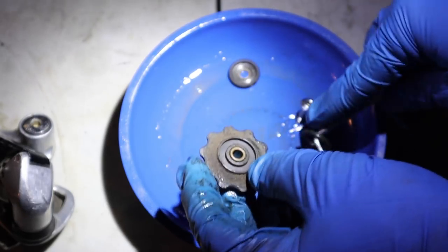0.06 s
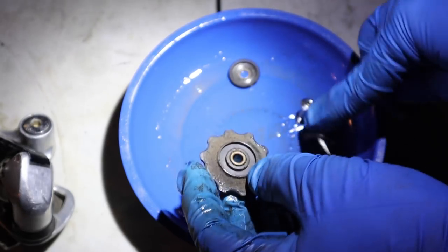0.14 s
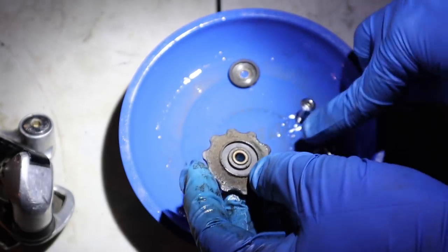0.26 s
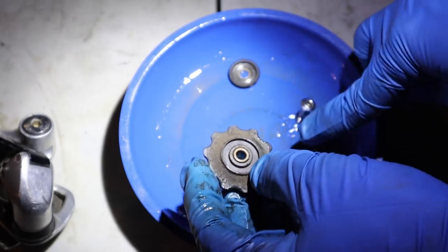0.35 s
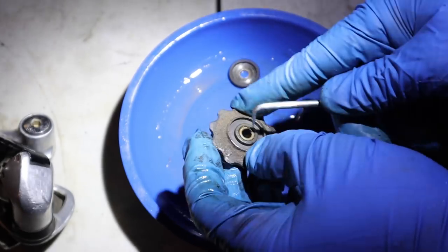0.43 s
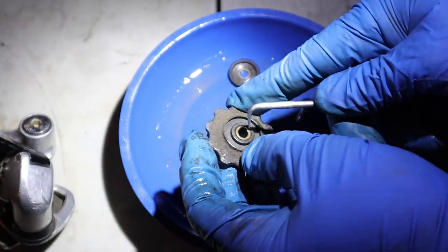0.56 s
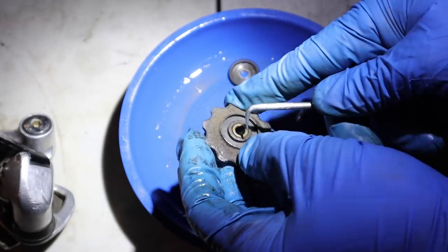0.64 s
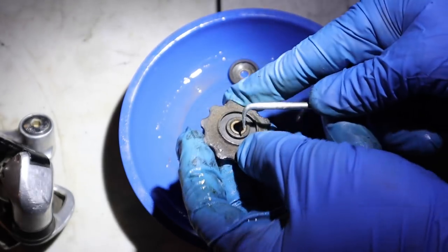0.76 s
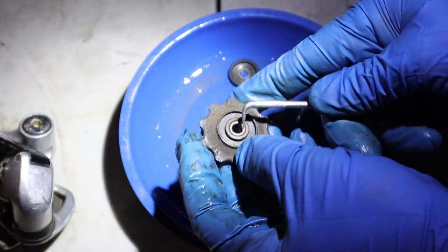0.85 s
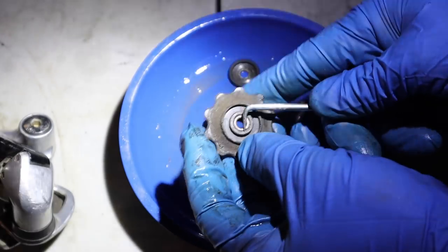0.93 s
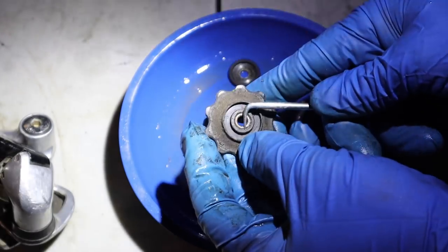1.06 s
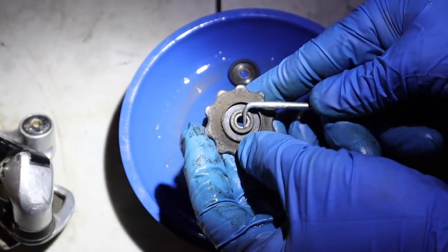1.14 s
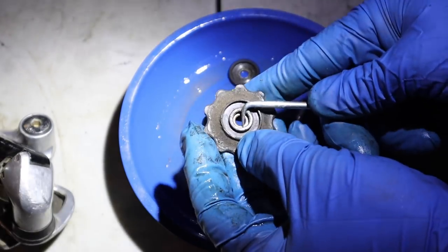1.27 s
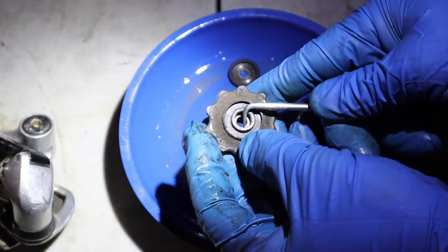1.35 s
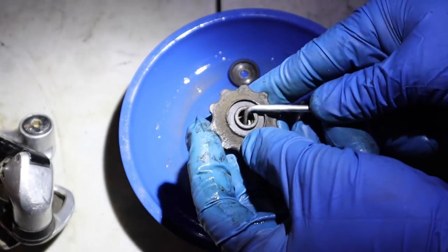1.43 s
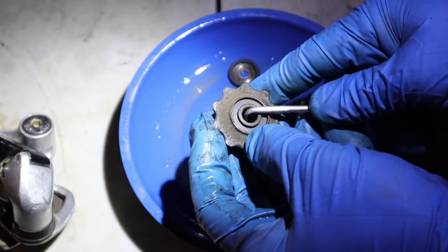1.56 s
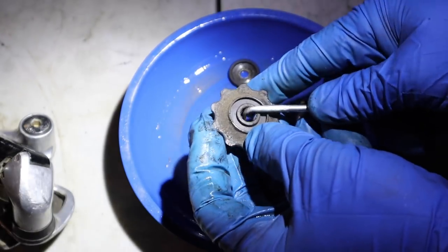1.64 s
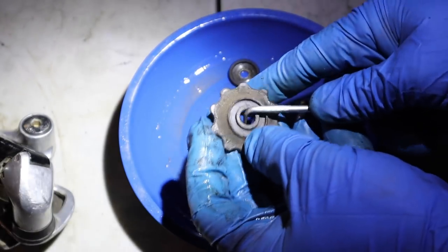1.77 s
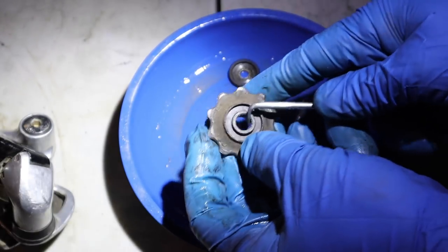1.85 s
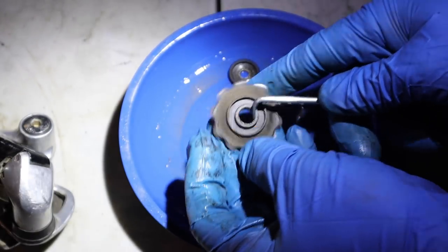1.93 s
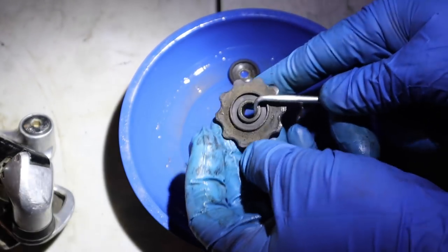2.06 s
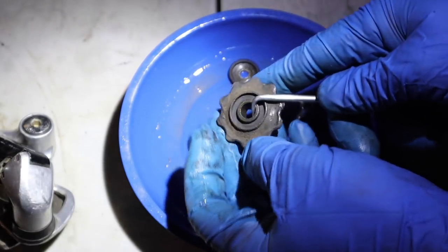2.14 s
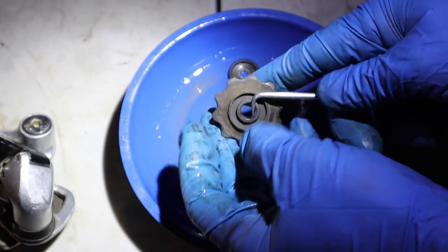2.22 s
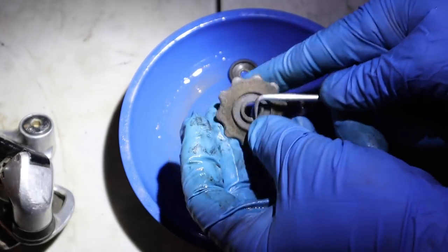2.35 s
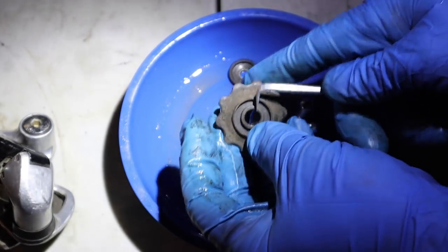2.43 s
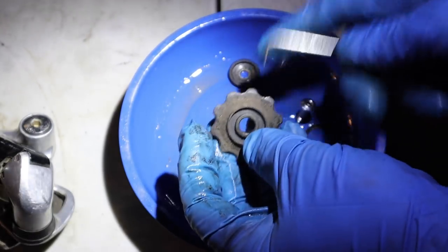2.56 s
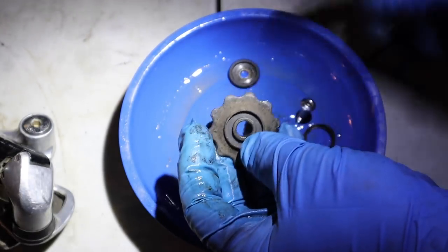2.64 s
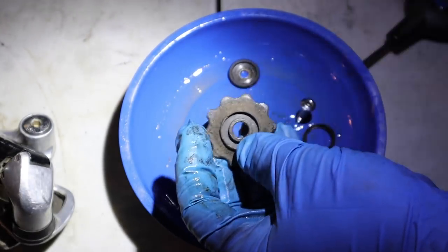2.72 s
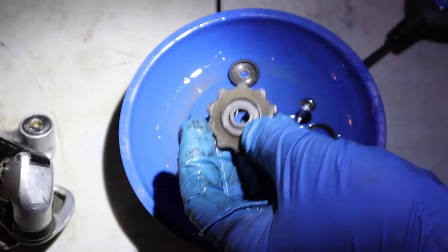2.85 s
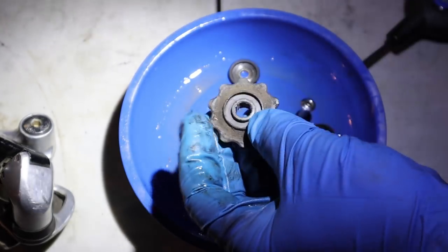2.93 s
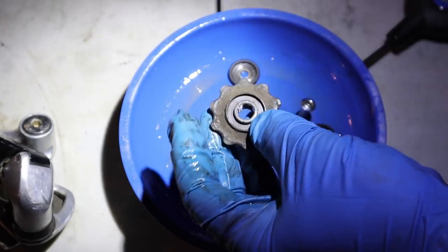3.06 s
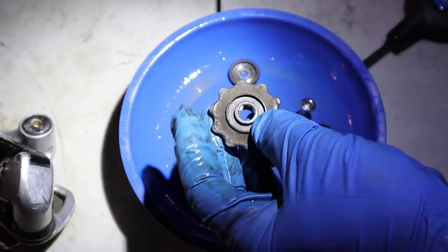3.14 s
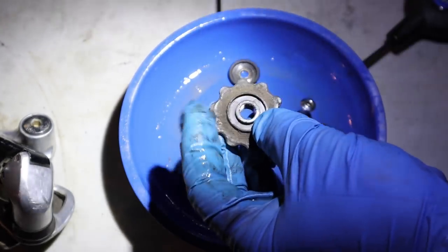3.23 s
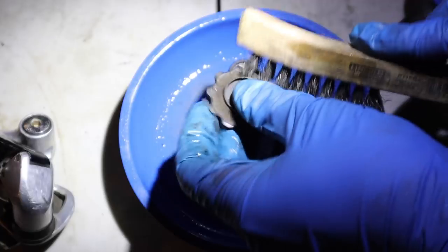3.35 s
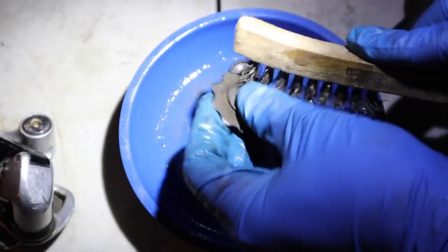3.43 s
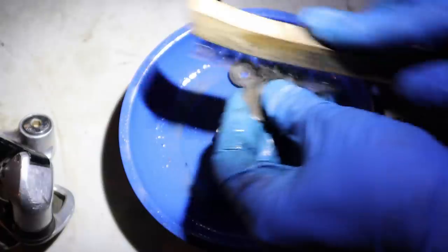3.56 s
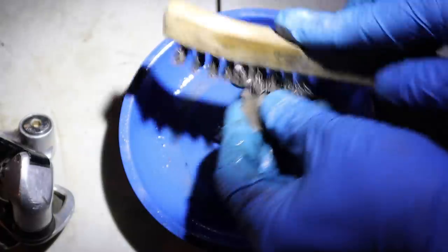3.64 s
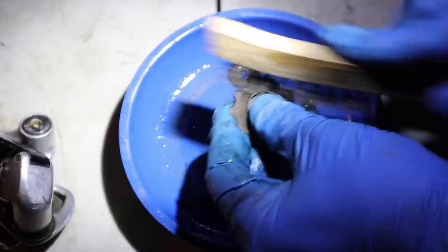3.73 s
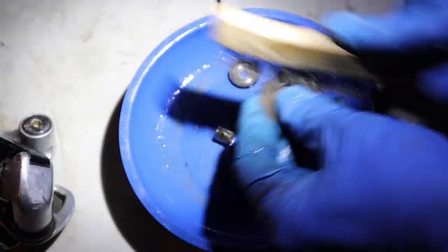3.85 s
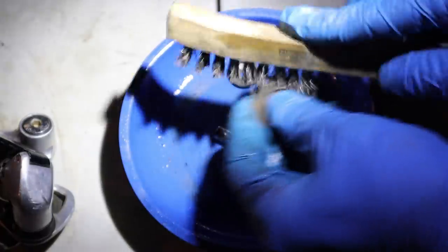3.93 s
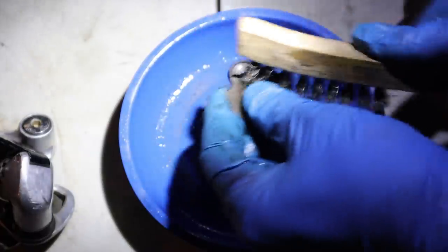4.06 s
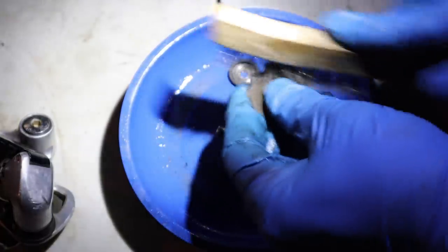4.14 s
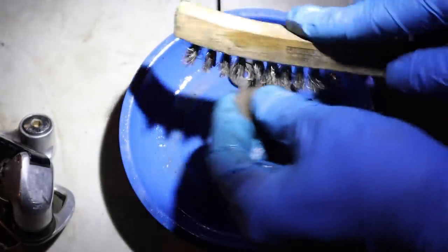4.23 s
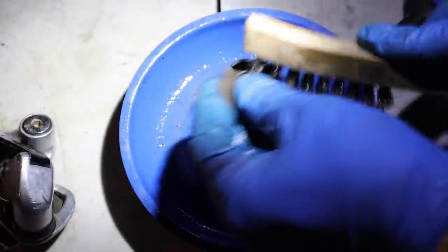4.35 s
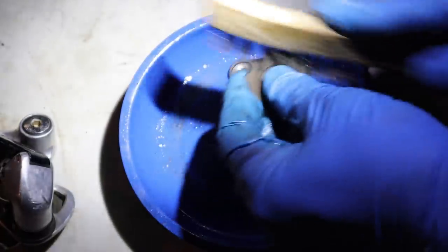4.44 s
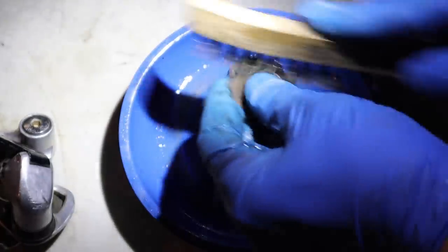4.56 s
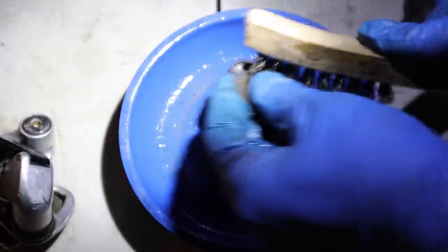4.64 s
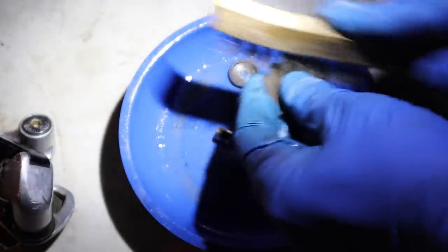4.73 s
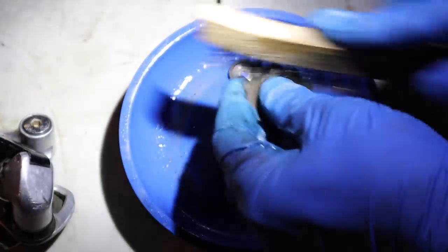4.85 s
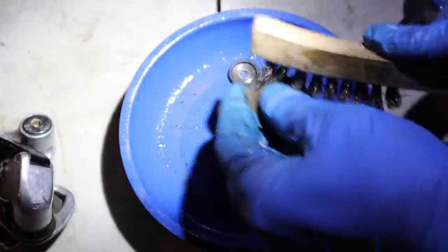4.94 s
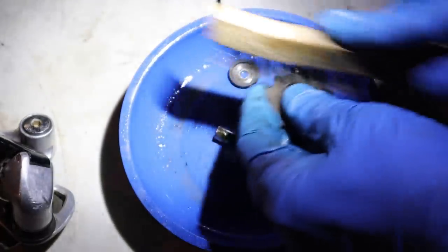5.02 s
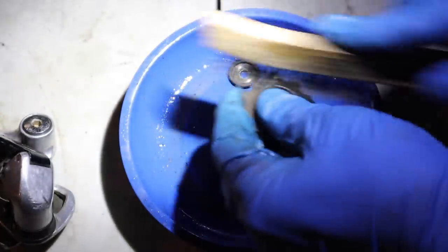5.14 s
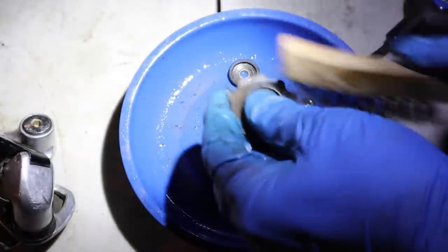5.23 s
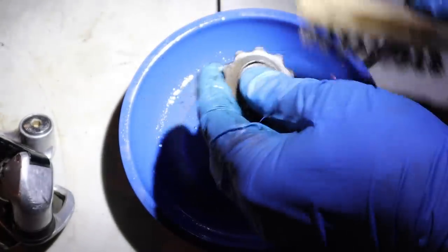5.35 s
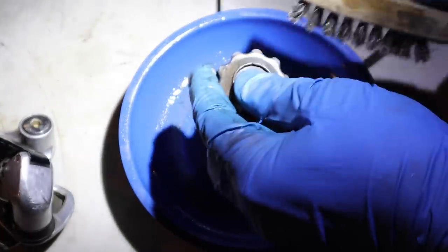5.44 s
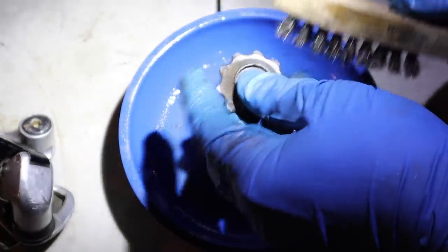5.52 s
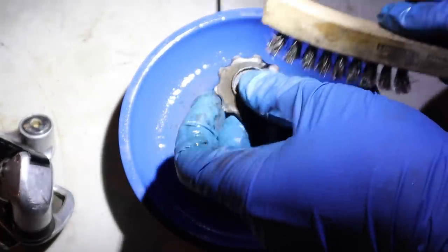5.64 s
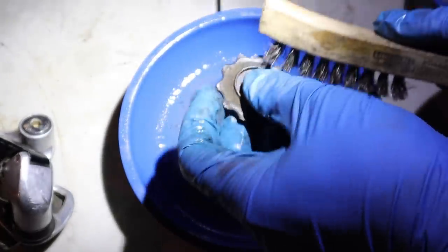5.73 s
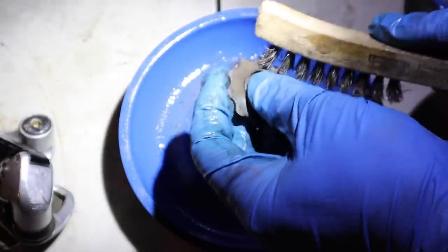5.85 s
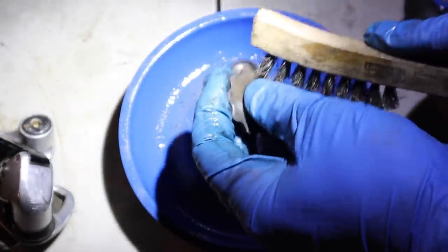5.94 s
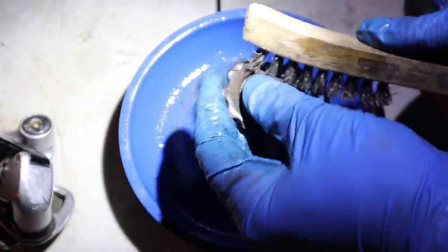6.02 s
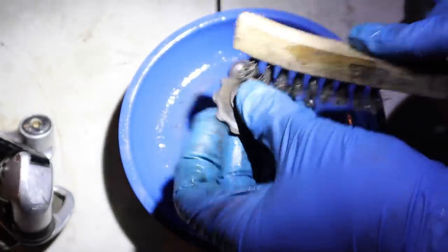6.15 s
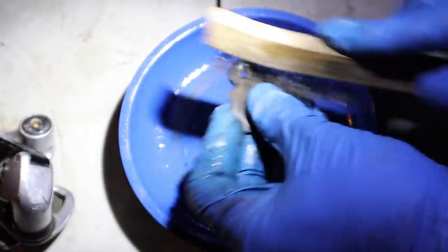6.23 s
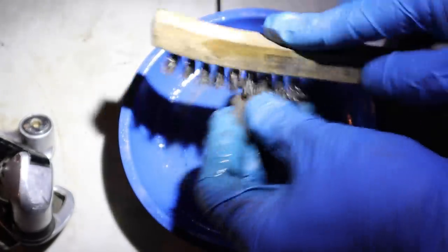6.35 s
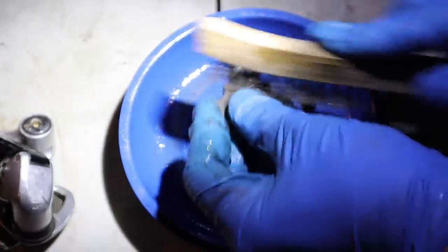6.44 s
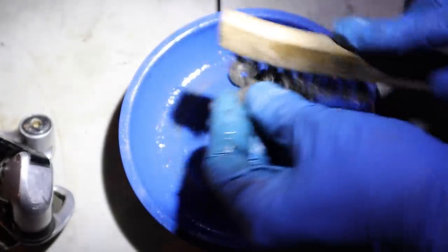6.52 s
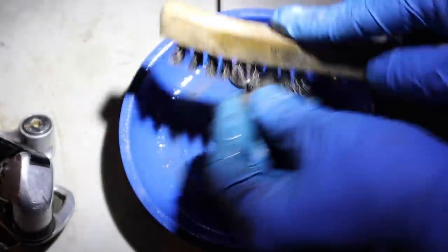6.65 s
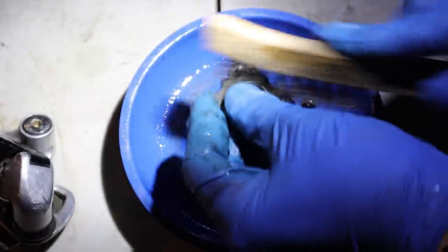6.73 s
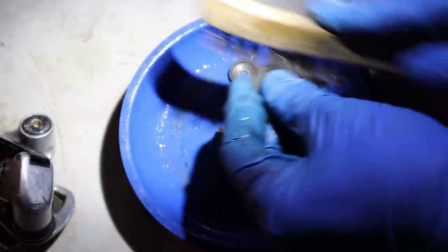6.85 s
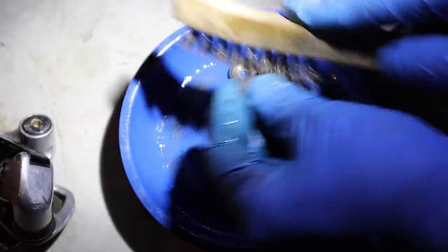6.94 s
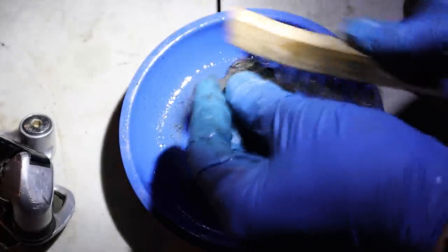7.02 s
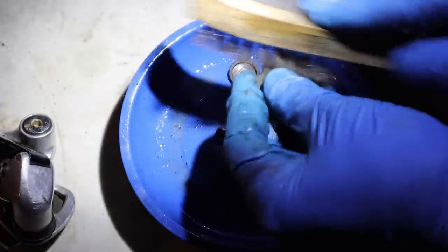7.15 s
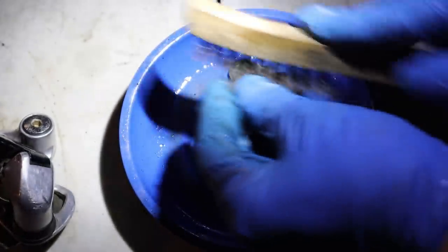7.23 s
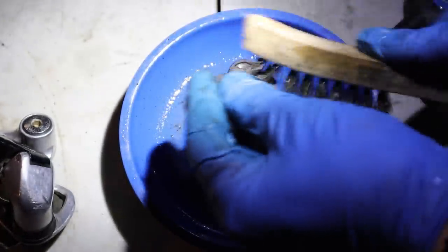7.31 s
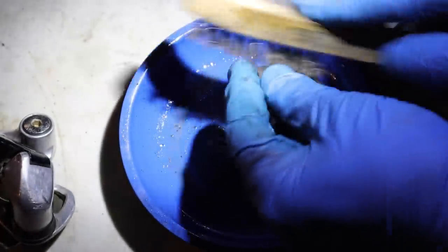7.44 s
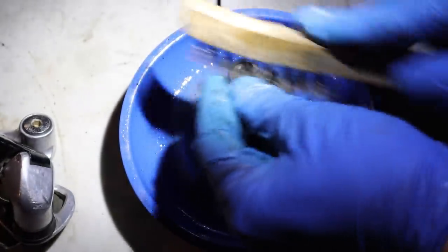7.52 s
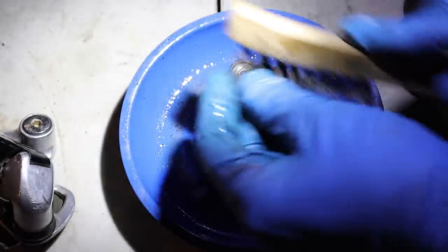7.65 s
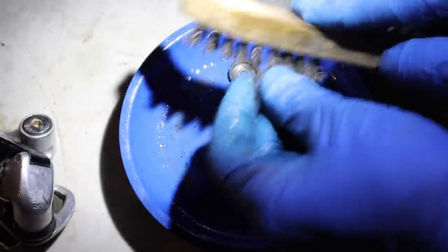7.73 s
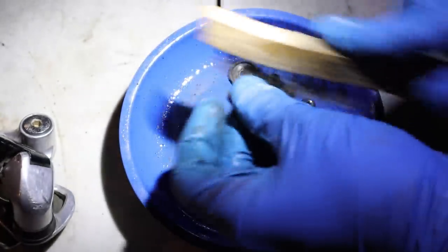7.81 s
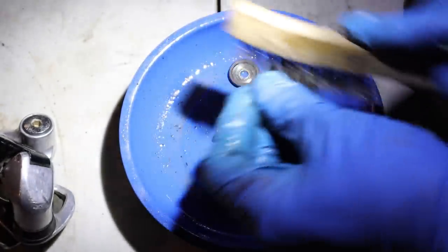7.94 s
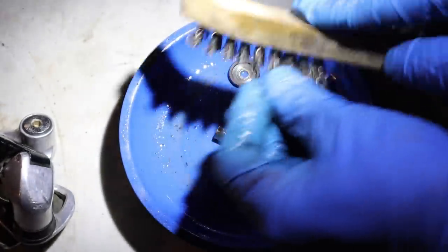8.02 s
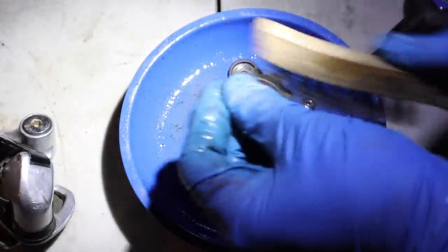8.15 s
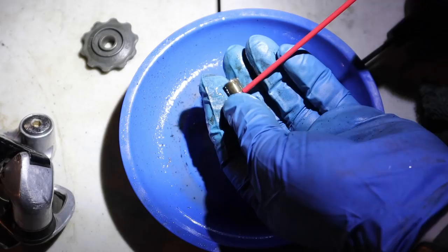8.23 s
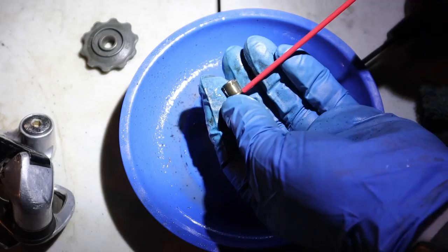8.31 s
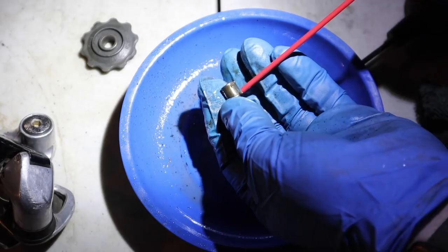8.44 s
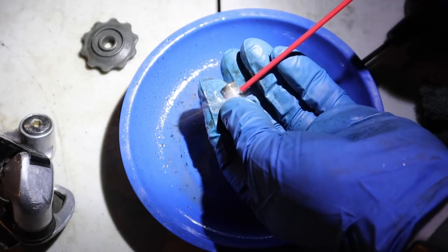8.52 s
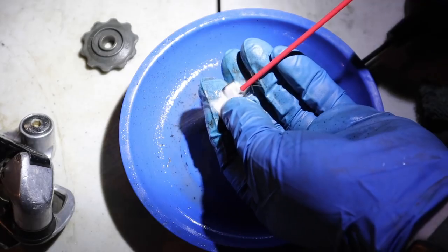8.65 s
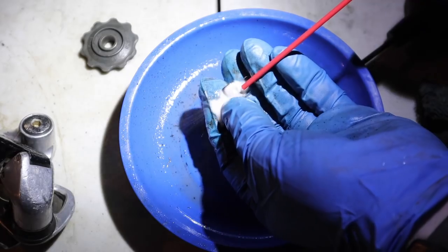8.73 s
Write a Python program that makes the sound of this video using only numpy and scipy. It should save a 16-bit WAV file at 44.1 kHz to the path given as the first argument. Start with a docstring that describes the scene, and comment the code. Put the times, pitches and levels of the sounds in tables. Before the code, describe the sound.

Throughout, crickets chirp in soft, high pulsing trills nearly three times a second, over a low wavering machine hum, gentle air noise and thin hiss. From 0 to 2.3 s there are only faint glove rustles and tiny ticks, with a small ping near 1.3 s. At about 2.4 s two loud, bright steel taps crack in quick succession, the first ringing briefly, the second quickly damped, with faint bowl knocks. Handling and clicks grow around 3.3 s. From 3.6 to 5.4 s a stiff brush scrubs a toothed wheel close up, about seven crisp strokes a second, with sharp bristle snaps. A pause brings rustles and brighter ticks near 6.1 s, then scrubbing resumes from 6.3 to 8.3 s. After a short lull, a spray can hisses at 8.5 s and from 8.6 s roars and spits crackling foam until the end.

```python
"""Crickets chirp at night over a humming machine; gloved hands clean a small toothed wheel over a plastic bowl.
A steel hook taps twice (ringing modes), then a stiff brush scrubs to and fro (random bristle slips and snaps).
A spray can hisses and spits foam at the end (coloured noise and clicks).
Gloves rustle and parts tick before and between the bouts of brushing (shaped clicks and noise bursts).
Crickets are swept sines, the background steady tones and noise."""
import sys
import numpy as np
from scipy import signal
from scipy.fft import rfft, irfft
from scipy.io import wavfile
from scipy.ndimage import uniform_filter1d

SR = 44100
rng = np.random.default_rng(int(sys.argv[2]) if len(sys.argv) > 2 else 0)


def to_wav(s):
    """Save 16-bit WAV."""
    ch = np.atleast_2d(s).T  # columns
    pcm = np.round(np.clip(ch, -1, 1) * 32767)  # PCM
    wavfile.write(sys.argv[1], SR, pcm.astype(np.int16))


def makeup_ratio(level_db):
    """Linear amplitude ratio for a level in decibels (20 dB per factor of ten)."""
    decades = np.asarray(level_db, float) / 20
    return 10 ** decades


N = 387176
T = np.arange(N) / SR


def level(x, db):
    """Scale to an rms level."""
    return x * makeup_ratio(db) / np.sqrt(np.mean(x ** 2))


def colour(x, points, size=2048):
    """Causal filter through (Hz, dB) points, from the folded cepstrum of the log gain."""
    hz, db = np.transpose(points)
    bins = np.maximum(np.arange(size // 2 + 1), 1) * SR / size
    cep = irfft(np.log(makeup_ratio(np.interp(np.log(bins), np.log(hz), db))))
    cep[1:size // 2] *= 2
    cep[size // 2 + 1:] = 0
    return signal.fftconvolve(x, irfft(np.exp(rfft(cep))))[:len(x)]


def curve(rows, column=1, off=-90):
    """A table column over time, at the off value outside it."""
    rows = np.array(rows)
    return np.interp(T, rows[:, 0], rows[:, column], off, off)


def walk(rate):
    """Random values held 1 / rate s and slewed; spread a little under 1."""
    k = int(SR / rate)
    held = np.repeat(rng.standard_normal(N // k + 1), k)
    return uniform_filter1d(held, k)[:N]


def grains(rate, spread_db):
    """Random clicks, a few far larger than the rest."""
    hit, sign, size = rng.random((3, N))
    size_db = np.minimum(-spread_db * np.log(size + 1e-9), 4 * spread_db)
    return (hit < rate / SR) * np.sign(sign - .5) * makeup_ratio(size_db)


def clicks(events, points, t60):
    """Short noise bursts of the given colour at (s, peak dB)."""
    out, age = np.zeros(N), np.arange(1536) / SR
    for s, db in events:
        burst = colour(rng.standard_normal(len(age)) * makeup_ratio(-60 * age / t60), points)
        i = int(s * SR)
        out[i:i + len(age)] += (burst * makeup_ratio(db) / np.abs(burst).max())[:N - i]
    return out


def tail(x, t60, wet_db):
    """Add a diffuse decay of exponentially fading noise."""
    age = np.arange(int(t60 * SR)) / SR
    decay = level(rng.standard_normal(len(age)) * makeup_ratio(-60 * age / t60), 0) / np.sqrt(len(age))
    return x + makeup_ratio(wet_db) * signal.fftconvolve(x, decay)[:N]


def swell(start, length, db, peak, arch):
    """Gain of one gesture: the hand speeds up, then slows; the sound follows a power of the speed."""
    fastest = start + np.clip(peak, .05, .95) * length
    share = np.interp(T, [start, fastest, start + length], [0, .5, 1])
    return makeup_ratio(db) * np.maximum(np.sin(np.pi * share), 0) ** arch


def brush():
    """Bristles slip off the teeth; tufts pass unevenly and the largest snap out of the hiss."""
    # (start [s], length [s], gain [dB], low scrape re gain [dB], share before the fastest moment)
    strokes = [(3.585, 0.16, -32, -11, 0.51), (3.794, 0.11, -32.5, -11, 0.37),
               (3.931, 0.12, -31, -11.5, 0.43), (4.078, 0.11, -30, -13.5, 0.4),
               (4.221, 0.1, -29.5, -11.5, 0.44), (4.37, 0.086, -29.5, -15, 0.45),
               (4.497, 0.12, -28.5, -12, 0.49), (4.648, 0.11, -31, -14.5, 0.49),
               (4.798, 0.099, -28.5, -12, 0.48), (4.935, 0.11, -29.5, -13.5, 0.49),
               (5.091, 0.087, -28.5, -12.5, 0.51), (5.228, 0.17, -31.5, -12.5, 0.34),
               (6.302, 0.15, -31.5, -14.5, 0.43), (6.495, 0.1, -33, -15.5, 0.46),
               (6.649, 0.093, -29.5, -14, 0.5), (6.784, 0.099, -31.5, -14.5, 0.39),
               (6.927, 0.089, -28, -14, 0.52), (7.057, 0.096, -31, -13, 0.45),
               (7.195, 0.09, -27.5, -13.5, 0.52), (7.332, 0.102, -31, -16, 0.45),
               (7.47, 0.1, -29, -15, 0.5), (7.607, 0.11, -30, -12.5, 0.46), (7.76, 0.089, -30, -13.5, 0.45),
               (7.901, 0.092, -31.5, -16, 0.38), (8.033, 0.094, -30.5, -15, 0.56),
               (8.167, 0.14, -31, -17, 0.43)]
    # loudest tufts snapping off a tooth: (time [s], peak [dB])
    big_snaps = [(3.8154, -12), (3.8297, -16), (3.8387, -16), (4.2728, -15), (4.2788, -14), (4.524, -14),
                 (4.5507, -15), (4.9692, -15), (5.138, -14), (6.3411, -13), (6.353, -10), (6.3771, -15),
                 (6.3858, -12), (6.3973, -15), (6.4093, -13), (6.5005, -15), (6.5318, -15), (6.7017, -14),
                 (6.9637, -14), (6.9782, -15), (7.2234, -15), (7.3517, -15), (7.5116, -15), (7.7855, -13),
                 (7.93, -15), (8.0757, -13), (8.1103, -15)]
    # bristle spectrum: (frequency [Hz], gain [dB])
    bristle = [(1180, -47), (2000, -21), (2410, -12.5), (2990, -5), (3260, -2), (5090, -3), (6470, -1),
               (8580, -1.5), (10200, -9.5), (13400, -5.5), (15500, -11.5)]
    # scrape spectrum: (frequency [Hz], gain [dB])
    scrape_tone = [(450, -18), (800, 7.5), (1150, 2), (1700, 3), (2400, -1.5), (3500, -16)]
    edge_s, arch, rest_db = 0.018, 1.67, -54  # run-in and run-out, power of speed, resting touch
    max_slips_per_s, min_slips_per_s, full_speed_db = 6000, 330, -36
    tuft_rows_per_s, mean_row_db = 80, 5
    small_snaps_per_s, small_snap_db = 66, 7  # largest peak re stroke gain

    gains = [swell(s - edge_s, length + 2 * edge_s, db, peak, arch) for s, length, db, _, peak in strokes]
    low = sum(gain * makeup_ratio(row[3]) for gain, row in zip(gains, strokes))

    # the brush rests on the wheel in gaps under 0.2 s
    ends = [(s, s + length) for s, length, *_ in strokes]
    touching = sum((T > a) & (T < b) for (_, a), (b, _) in zip(ends, ends[1:]) if b - a < .2)
    push = sum(gains) + makeup_ratio(rest_db) * touching

    # each row of tufts starts abruptly and fades
    row_phase = np.cumsum(tuft_rows_per_s * (1 + .2 * walk(40))) / SR % 1
    row_db = mean_row_db * np.clip(1 + .7 * walk(7), 0, 2) * np.exp(-row_phase / .25)
    tufts = makeup_ratio(2.0 * walk(160) + row_db)

    # slips thin out to single ticks as the brush slows
    rate = max_slips_per_s * (push / makeup_ratio(full_speed_db)) ** 1.5
    rate = np.clip(rate, min_slips_per_s, max_slips_per_s)
    slips = grains(rate, spread_db=2.6) / np.sqrt(rate)
    slips = level(colour(slips * tufts, bristle), 0.53)
    scrape = level(colour(rng.standard_normal(N) * tufts, scrape_tone), 1.06)

    chance = rng.random((600, 3)) * [T[-1], 600 * SR / N, 1]
    small = [(s, small_snap_db - 5 * size) for s, keep, size in chance if keep < small_snaps_per_s]
    snaps = clicks(big_snaps, bristle, t60=.0028) + push * clicks(small, bristle, t60=.0028)
    return slips * push + scrape * low + snaps


def taps():
    """Steel on the wheel: a crack, then its modes, until a finger stops the ring."""
    # (time [s], ring gain [dB], crack peak [dB], ring stopped after [s], upper mode gain [dB])
    # upper modes are weighted per blow; the faint third contact rings mostly in them
    blows = [(2.3748, -4, -8, .2, -1), (2.4523, -4.5, -14, .017, -5), (2.455, -24, -15, .015, 14)]
    # wheel modes: (frequency [Hz], level [dB], t60 [s])
    wheel = [(2617, 1, 0.064), (4640, -16.5, 0.031), (5000, -19.5, 0.056), (5230, -20, 0.043),
             (5550, -27, 0.035), (7650, -22, .025), (7960, -20, .025), (8660, -23, .03), (9400, -16, 0.017),
             (11000, -19, 0.012), (13920, -19, .008)]
    crack_tone = [(300, -40), (1000, -12), (1900, -10), (2600, 14), (4000, -2), (6000, -3),
                  (8500, 4), (11000, -8), (16000, -25)]  # (Hz, dB)
    stop_db_per_s = 4900

    out, age = np.zeros(N), np.arange(SR // 5) / SR
    lowest, *upper = (makeup_ratio(db - 60 * age / t60) * np.sin(2 * np.pi * hz * age) for hz, db, t60 in wheel)
    upper = sum(upper)
    for s, db, _, stop_s, upper_db in blows:
        i = int(s * SR)
        ring = lowest + makeup_ratio(upper_db) * upper
        out[i:i + len(age)] += makeup_ratio(db - stop_db_per_s * np.maximum(age - stop_s, 0)) * ring
    out = colour(out, [(200, -30), (1700, 1)])  # keep the ring free of low thump
    crack = clicks([(s, db) for s, _, db, *_ in blows], crack_tone, t60=0.0046)
    return tail(out + crack, t60=.09, wet_db=-30)


def spray():
    """A jet of gas and droplets; once foam fills the straw it roars and spits."""
    # (time [s], gas hiss level [dB], foam roar level [dB])
    flow = [(8.507, -63, -70), (8.509, -31, -45), (8.53, -31.5, -57), (8.6, -28.5, -36),
            (8.62, -28.5, -24.5), (8.68, -28, -22), (8.78, -36, -23.5)]
    # jet spectrum: (frequency [Hz], gain [dB])
    jet_tone = [(500, -27), (950, -19), (1430, -7.5), (2400, -4), (3330, -0.5), (4490, -10), (5400, -5),
                (6900, -9.5), (8600, -2), (10400, -18), (15500, -16)]
    # foam spectrum: (frequency [Hz], gain [dB])
    foam_tone = [(200, -17), (950, -17.5), (1430, -16), (2380, -16), (3010, -1.5), (3900, -8), (4500, -16),
                 (5500, -2), (6900, -9), (8200, 0.5), (9600, -1.5), (10400, -14), (13900, -7.5),
                 (15500, -11)]
    # loudest spits from the straw: (time [s], peak [dB])
    spits = [(8.6217, -9), (8.638, -3), (8.6483, -8), (8.654, -6), (8.6612, -6), (8.6768, -9), (8.6838, -3),
             (8.6894, -6), (8.6949, -6), (8.7039, -6), (8.7095, -4), (8.7193, -4), (8.7447, -7),
             (8.7543, -8), (8.7685, -8), (8.7742, -9)]
    spit_tone = [(300, -15), (1000, -9), (3000, -3.5), (8000, 1), (11000, -4), (15500, -9)]  # (Hz, dB)

    jet = level(colour(rng.standard_normal(N) * makeup_ratio(1.9 * walk(120)), jet_tone), 0)
    foam = level(colour(grains(12000, spread_db=4.0) * makeup_ratio(walk(150)), foam_tone), 0)
    flowing = jet * makeup_ratio(curve(flow)) + foam * makeup_ratio(curve(flow, column=2))
    return flowing + clicks(spits, spit_tone, t60=0.0011)


def hands():
    """Rubber rustles; small parts tick with a duller knock, bumps ring the bowl and the hook pings."""
    # gloves and bristles shifting: (start [s], length [s], gain [dB], share before the loudest moment)
    shifts = [(0, 0.68, -60.5, 0.41), (.9, .16, -59.5, .25), (1.64, .08, -63, .4), (1.8, .12, -64, .5),
              (1.97, .12, -60, .4), (2.15, .19, -61, .8), (2.72, 0.15, -60, 0.32), (2.9, .16, -57, .5),
              (3.06, 0.33, -58, 0.7), (3.3, 0.38, -48.5, .8), (5.4, 0.62, -61, 0.89),
              (5.996, .045, -46.5, .4), (6.07, 0.13, -50.5, .4), (6.183, 0.18, -46.5, 1)]
    # glove spectrum: (frequency [Hz], gain [dB])
    glove = [(1200, -10), (2500, 4.5), (5000, 3.5), (8500, 3), (10500, -3.5), (14000, 0), (16000, -22)]
    # parts and wet rubber: (time [s], peak [dB], low part re peak [dB])
    ticks = [(1.0110, -31, -14), (1.278, -36, -14), (1.3465, -33, -12), (2.0262, -34, -14),
             (2.9168, -39, -12), (3.2100, -40, -14), (3.2900, -40, -12), (3.3787, -31, -9),
             (3.4380, -36, -14), (3.496, -35, -16), (3.5345, -31, -18), (3.5654, -29, -18),
             (5.6615, -38, -14), (5.7997, -36, -16), (6.0060, -27, -14), (6.0185, -27, -14),
             (6.1017, -31, -14), (6.1152, -17, -21), (6.1275, -33, -16), (6.1612, -21, -18),
             (6.1890, -28, -18), (6.2848, -30, -16), (6.2958, -27, -16)]
    # hands and parts on the bowl: (time [s], level [dB])
    soft_bumps = [(2.11, -38.5), (2.374, -33), (2.455, -31.5), (3.28, -39), (3.3, -41.5)]
    # bowl modes: (frequency [Hz], level [dB], t60 [s])
    bowl = [(221, -8, 0.037), (327, 0, 0.047), (557, -2.5, 0.046), (650, -8, 0.038)]
    # hook on small parts: (time [s], peak [dB], pitch [Hz])
    pings = [(1.005, -41, 2000), (1.2765, -28, 1620), (2.6349, -44, 2100), (2.7485, -45, 2200),
             (3.438, -28, 2700), (6.5, -29, 2680)]
    dull_tone = [(900, -23), (1700, 9), (2300, -10), (3000, -2), (4000, -4), (5100, -13), (7000, -37)]  # (Hz, dB)

    rustle = level(colour(grains(2000, spread_db=3.5) * makeup_ratio(3.2 * walk(60)), glove), 1.3)
    rustle = rustle * (makeup_ratio(-74) + sum(swell(*row, arch=0.91) for row in shifts))
    bright = clicks([(s, db) for s, db, _ in ticks], glove, t60=.0016)
    dull = clicks([(s, db + low_db) for s, db, low_db in ticks], dull_tone, t60=0.0051)

    # each bump lands somewhere else on the plastic wall and weights its modes anew
    knocks, age = np.zeros(N), np.arange(SR // 10) / SR
    place = rng.standard_normal((len(soft_bumps), len(bowl)))
    for (s, db), weights in zip(soft_bumps, place):
        for (hz, mode_db, t60), w in zip(bowl, weights):
            mode = makeup_ratio(db + mode_db + 3.2 * w - 60 * age / t60) * np.sin(2 * np.pi * hz * age)
            knocks[int(s * SR):][:len(age)] += mode
    for s, db, hz in pings:
        knocks[int(s * SR):][:len(age)] += makeup_ratio(db - 60 * age / 0.016) * np.sin(2 * np.pi * hz * age)
    return rustle + bright + dull + knocks


def wing(hz, rate, duty, sag, scatter, overtone_db):
    """A wing rings afresh at each stroke, with its own pitch and strength; the pitch sags through the stroke."""
    turns = np.cumsum(rate * (1 + 0.055 * walk(20))) / SR + rng.random()
    draws = rng.standard_normal((int(turns[-1]) + 1, 3))
    start, pitch, size = draws[turns.astype(int)].T
    stroke = np.minimum(turns % 1 / duty, 1)
    wing_hz = hz * (1 + scatter * pitch + sag * (.5 - stroke))
    phase = 2 * np.pi * (np.cumsum(wing_hz) / SR + start)
    tone = np.sin(phase) + makeup_ratio(overtone_db) * np.sin(2 * phase)
    return np.sin(np.pi * stroke) * makeup_ratio(1.9 * size) * tone


def crickets():
    """Two groups of low singers chirp at slightly different rates, and a higher kind evenly; the yard smears both."""
    # one singer a row in each group: (wing pitch [Hz], mean wing strokes [1/s], relative level [dB])
    singers = [(2817, 57, 0), (2934, 60, 4), (2987, 45, 2.5), (3040, 59, 3), (3120, 69, -13.5),
               (3120, 47, -0.5)]
    # groups drift in and out of step: (a chirp peak [s], chirps [1/s], level before chirp gate [dB])
    groups = [(0.006, 2.724, -37.5), (-0.034, 2.845, -42)]
    chirp_edge, chirp_lean, between_db = 3.27, -.05, -13  # edge steepness, negative = shorter, gate floor
    high_peak_s, high_chirps_per_s, high_hz, high_db = 0.1, 4.3, 3610, -55

    low = 0
    for peak_s, per_s, group_db in groups:
        group = 0
        for hz, rate, db in singers:
            song = wing(hz, rate, duty=.7, sag=.05, scatter=.011, overtone_db=-24)
            group = group + tail(makeup_ratio(db + 2 * walk(6)) * song, t60=0.071, wet_db=-1.5)
        cycle = np.cos(2 * np.pi * per_s * (T - peak_s))
        chirp = 1 / (1 + np.exp(-chirp_edge * (cycle + chirp_lean)))
        low = low + level(group, group_db) * np.sqrt(chirp + makeup_ratio(between_db) ** 2)

    gate = np.clip(.6 + .6 * np.cos(2 * np.pi * high_chirps_per_s * (T - high_peak_s)), .35, 1)
    high = sum(wing(high_hz * shift, 64 * shift, duty=.7, sag=.03, scatter=0.013, overtone_db=-39)
               for shift in (.98, 1.0, 1.02))
    return low + level(tail(high * gate, t60=0.91, wet_db=-4), high_db)


def background():
    """Wavering machine hum, low air noise that swells a little, a far drone and a thin hiss."""
    # machine hum: (frequency [Hz], median rms level [dB])
    partials = [(58.3, -68), (116.6, -52.5), (164.6, -60), (233.3, -58), (349.9, -64)]
    # air spectrum: (frequency [Hz], gain [dB])
    air_tone = [(15, -47), (25, -18), (49, -9), (87, -7), (150, -4), (234, -3), (376, -6.5), (600, -8),
                (900, -13.5), (1490, -16.5), (2400, -24.5), (3500, -41)]
    # hiss spectrum: (frequency [Hz], gain [dB])
    hiss_tone = [(1500, -16), (2600, 2.5), (3400, 12.5), (4500, -4), (6000, -1.5), (8000, -4), (12000, -8),
                 (16000, -8)]
    # far drone that comes and goes: (time [s], level [dB])
    drone_course = [(0, -61), (.4, -62), (.7, -56), (1.5, -54.5), (2.2, -55.5), (2.6, -71), (5.4, -62),
                    (6, -54.5), (8.78, -71)]
    drone_tone = [(500, -28), (800, -1.5), (1050, -2.5), (1500, -32)]  # (Hz, dB)

    hum = sum(makeup_ratio(db + 2.0 * walk(3.6)) * np.sqrt(2) * np.sin(2 * np.pi * (hz * T + rng.random()))
              for hz, db in partials)
    air = level(colour(rng.standard_normal(N), air_tone, size=8192) * makeup_ratio(0.53 * walk(2.65)), -48.5)
    drone = level(colour(rng.standard_normal(N), drone_tone), 0) * makeup_ratio(curve(drone_course))
    hiss = level(colour(rng.standard_normal(N), hiss_tone), -54.5)
    return hum + air + drone + hiss


def scene():
    """Brush and hand sounds come back from the bowl floor half a millisecond later, shifting as the hands move."""
    mean_echo_s, echo_gain = 0.000478, 0.35
    work = brush() + hands()
    echo = np.interp(T - mean_echo_s * (1 + 0.25 * walk(14)), T, work)
    near = tail(work + echo_gain * echo + spray(), t60=.06, wet_db=-20)
    return (near + taps() + crickets() + background())[None]


def roll_off(x):
    """The treble ends steeply here."""
    return signal.sosfilt(signal.butter(12, 17040, fs=SR, output="sos"), x)


def record(dry):
    """The top is cut steeply at 15.8 kHz, then peaks clip at full scale."""
    top = signal.ellip(10, .2, 60, 15800, fs=SR, output="sos")
    mix = np.clip(signal.sosfilt(top, dry), -1, 1)
    return roll_off(mix)


dry = scene()
out = record(dry)
to_wav(out)
```